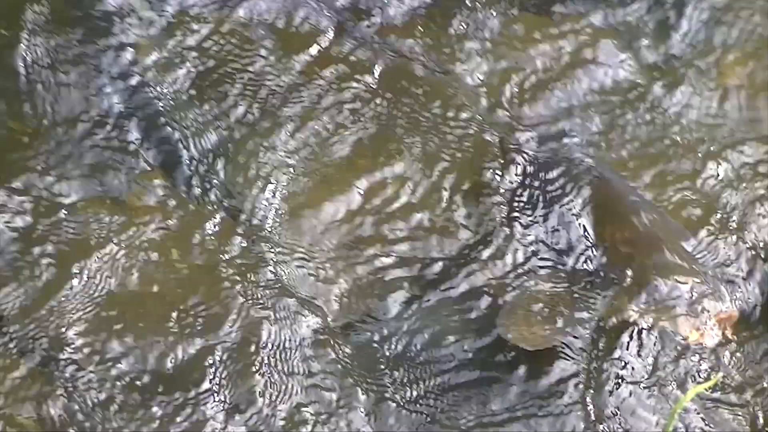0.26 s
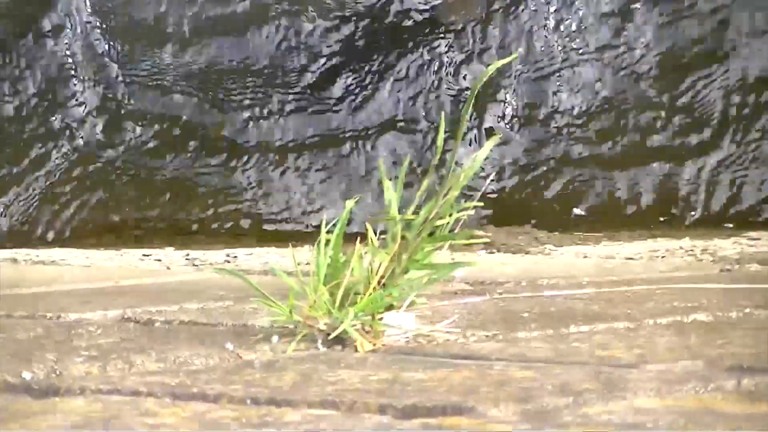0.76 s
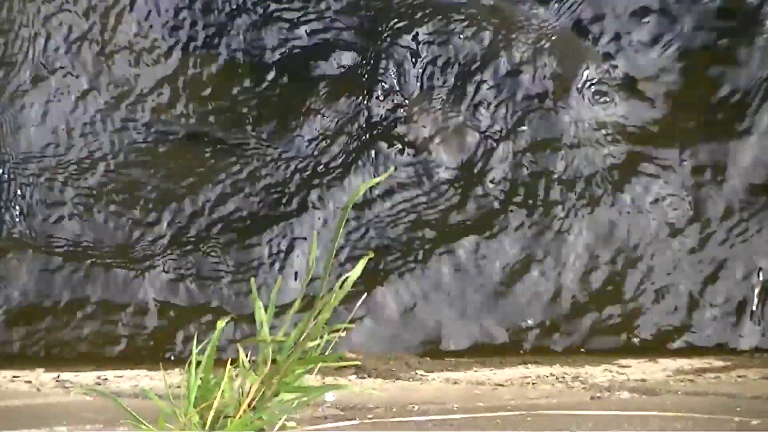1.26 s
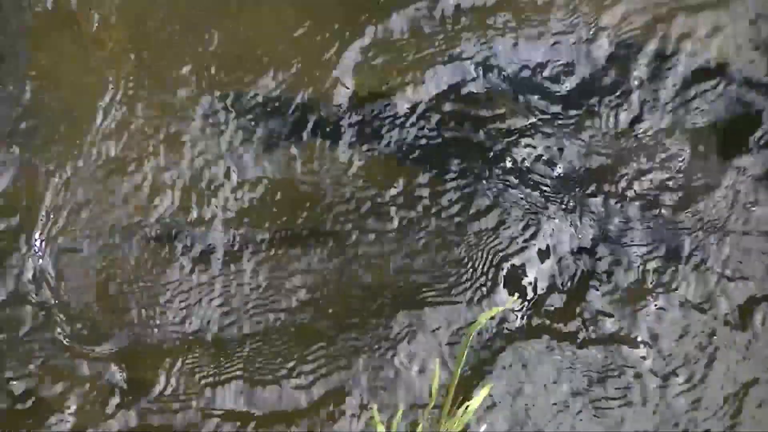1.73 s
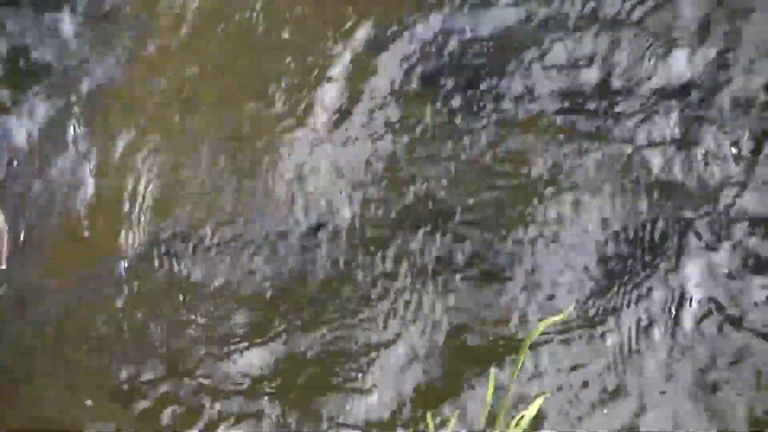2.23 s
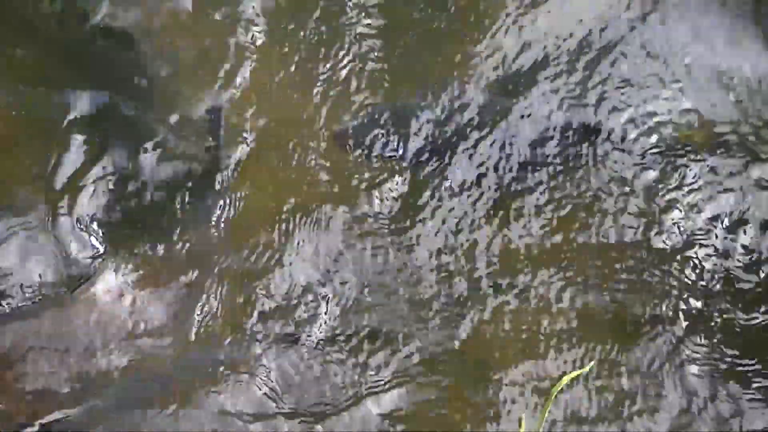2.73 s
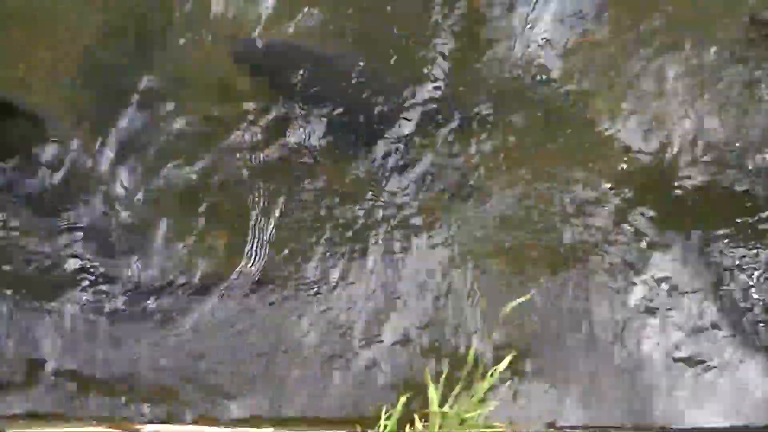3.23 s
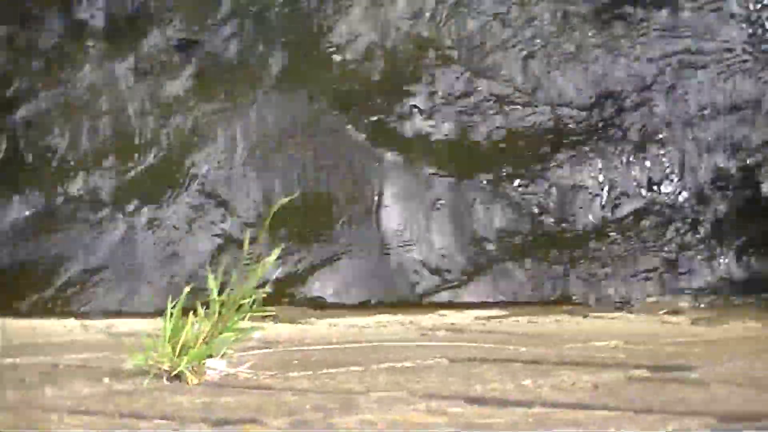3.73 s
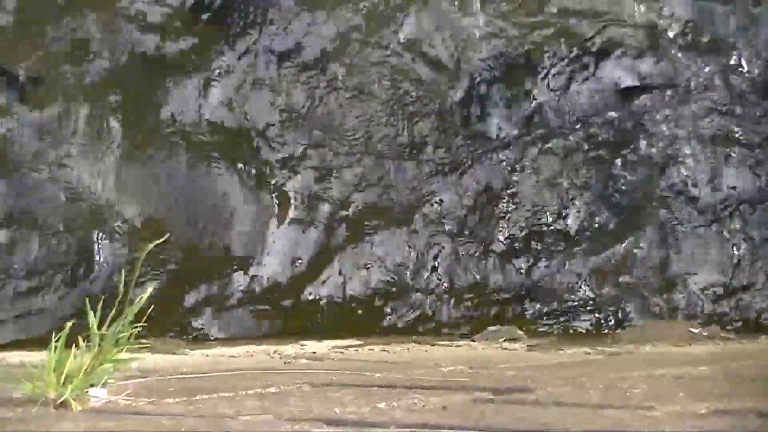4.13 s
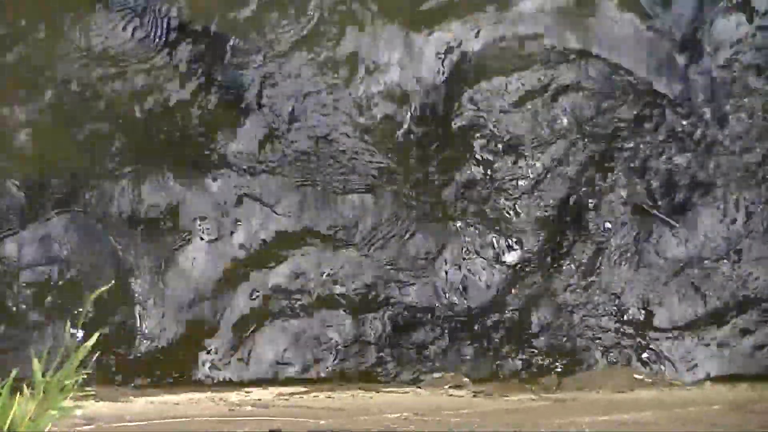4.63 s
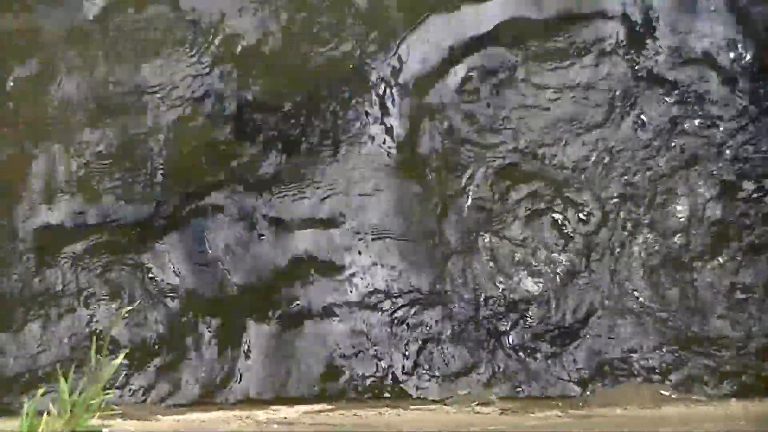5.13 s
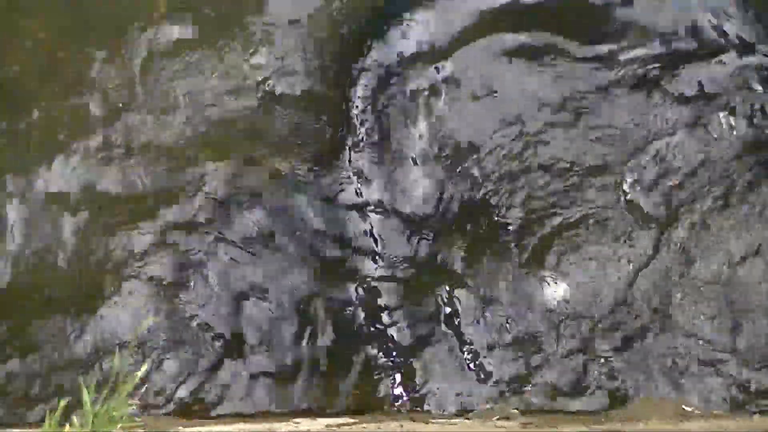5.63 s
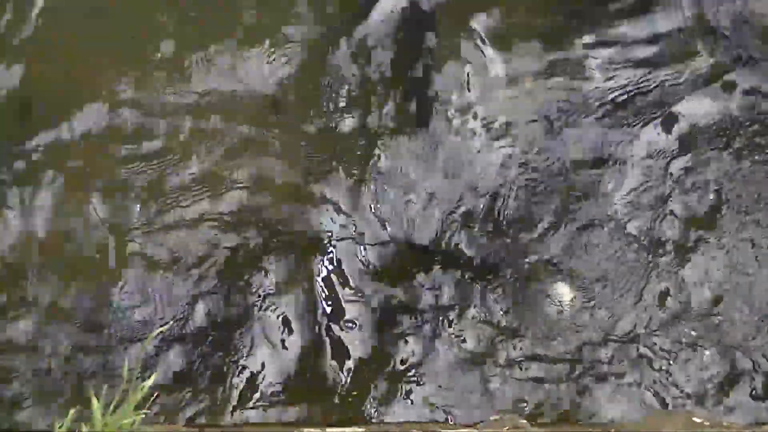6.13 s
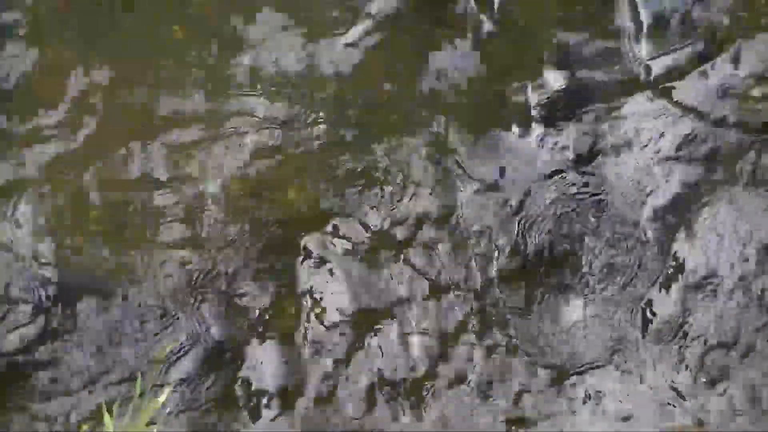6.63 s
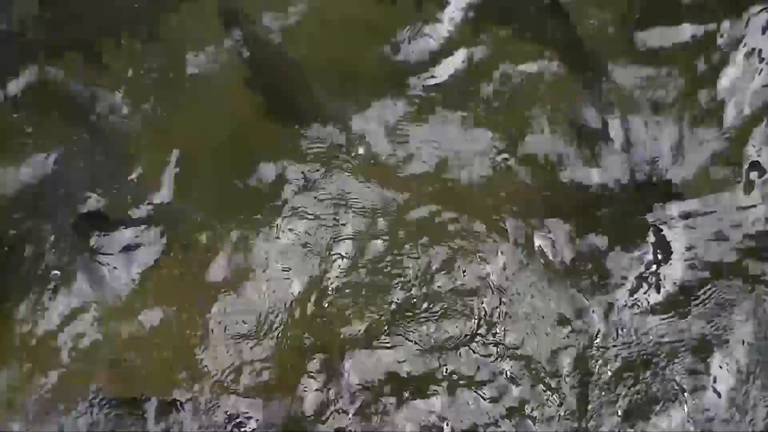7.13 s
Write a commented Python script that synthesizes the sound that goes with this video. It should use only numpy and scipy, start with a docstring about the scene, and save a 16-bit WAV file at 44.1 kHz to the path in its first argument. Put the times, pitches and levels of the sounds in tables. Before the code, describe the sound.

River water rushes softly while fish smack sharply at the surface, then thrash in bubbly splashes with spray, ringing plops and ticking drops.

```python
"""A river runs past a concrete bank, heard from just above the water.
The current rushes throughout (noise in flickering bands plus small bubbles) over a far wavering hum.
At first a few bubbles, gulps and one light stroke sound; then fish smack sharply (short pops and cracks).
Next a fish thrashes: strokes of bubbly noise and spray, with ringing bubbles and drops, and more smacks.
During the last strokes the hum swells; then one thin sinking whistle passes, and the last bubbles ring."""
import sys
import numpy as np
from scipy import signal
from scipy.fft import rfft, irfft
from scipy.io import wavfile

SR = 44100
rng = np.random.default_rng(int(sys.argv[2]) if len(sys.argv) > 2 else 0)


def output_pcm(signal):
    """Save a mono or channel-first signal as 16-bit PCM at the path in sys.argv[1].

    Samples are clipped to [-1, 1] before scaling.
    """
    pcm = np.clip(np.atleast_2d(signal).T, -1, 1) * 32767
    wavfile.write(sys.argv[1], SR, np.round(pcm).astype(np.int16))


N = 325440  # length of the scene in samples


# tone colour of a smack's crack: pitch_hz, level_db (relative)
CRACK_COLOUR = [(30, -61.5), (150, -34), (400, -62), (900, -16.5), (1700, -4), (2700, -5.5), (4000, -3.5),
                (5500, -8), (8000, -16), (12000, -25), (16000, -45)]
# fish smacks: start_s, pop_peak_db, pop_pitch_hz, rise_cycles (to the pop's peak), crack_db (before the tilt),
# crack_tilt_db_per_octave (around 4000 Hz), crack_length_cycles (of the pop)
FISH_SMACKS = [(1.8190, -17, 1550, 2.4, -15, 3.5, 7.2), (1.8201, -16, 3760, 5.1, -29, -1, 13),
               (2.0807, -14, 6170, 0.61, -25.5, 4, 16), (2.1180, -1, 4770, 1.33, -23.5, 9, 18),
               (2.1629, -1, 4650, 1.17, -18.5, 4, 18), (2.252, -19, 4650, 1.3, -37, 6, 4.3),
               (2.2873, -39, 4200, 2.5, -42, -2, 10), (3.1590, -23, 2210, 3.9, -36, -6.5, 7.9),
               (3.2030, -24, 2180, 1.9, -56, -12, 4.6), (3.6338, -21.5, 3400, 1.2, -24, -0.5, 13),
               (4.1596, -30, 4000, 0.43, -34, 5, 9.4), (4.263, -23, 5000, 0.5, -35.5, 3, 12),
               (4.4396, -31, 4440, 2.5, -37, 2, 10)]


def smacks(tail_db=-0.5, tail_s=0.0034, damping=0.67, attack_s=0.0014):
    """Fish mouths break the surface: a pop, a wet crack, and a short scatter off the bank whose treble dies first."""
    out = np.zeros(N)
    t = np.arange(4096) / SR
    for start_s, pop_db, hz, rise_cycles, crack_db, tilt_db, length_cycles in FISH_SMACKS:
        noise = colour(rng.standard_normal(len(t)), CRACK_COLOUR)
        crack = np.zeros(len(t))
        for centre_hz, band in bands(noise, count=10):
            height = centre_hz / 4000
            burst = np.exp(-(t * hz * height ** 0.2 / length_cycles) ** 4)
            tail = undb(tail_db) * np.exp(-t * height ** damping / tail_s)
            crack += band * undb(tilt_db * np.log2(height)) * (burst + tail)
        crack *= 1 - np.exp(-t / attack_s)
        add(out, start_s, undb(pop_db) * pop(t, hz, rise_cycles) + undb(crack_db) * crack)
    # so small a source radiates no bass
    return signal.sosfilt(signal.butter(2, 300, "high", fs=SR, output="sos"), out)


# tone colours of the slosh and of the spray: pitch_hz, level_db (relative)
SLOSH_COLOUR = [(40, -51), (150, -18), (400, -11), (800, 4.5), (1250, 6.5), (2200, 9), (3500, -0.5),
                (6000, -61)]
SPRAY_COLOUR = [(100, -17), (1500, 19), (3100, 6.5), (4100, -1), (5300, 1.5), (7500, 4.5), (9500, -0.5),
                (13000, -2), (16000, -16)]


def churn():
    """A thrashing fish folds air into the water and throws up a fine spray."""
    gurgle = swarm(count=7000, low_hz=215.5, high_hz=3900, cycles=11.6, spread_db=1.9, lift=0.22)
    slosh = colour(gurgle + undb(-9.5) * rng.standard_normal(N), SLOSH_COLOUR)
    droplets = swarm(count=18000, low_hz=2900, high_hz=15400, cycles=9, spread_db=3.8, lift=0.12)
    droplets = scatter(droplets, wet_db=-10, decay_s=0.00049)
    spray = colour(droplets + undb(-13.5) * rng.standard_normal(N), SPRAY_COLOUR)
    surge = walk(60)  # each wavelet lifts slosh and spray together
    patter = walk(380)  # droplets land in tiny volleys
    slosh = slosh * agitation(column=1) * undb(2.0 * surge)
    spray = spray * agitation(column=2) * undb(2.2 * surge + 2.6 * patter)
    return slosh + spray


# strokes of a fish's tail and body: height_s (moment of greatest strength), slosh_db, spray_db,
# length_s (time constant of the collapse)
FISH_STROKES = [(0.717, -65, -53.5, 0.054), (2.833, -42.5, -50, 0.11), (2.914, -41.5, -44.5, 0.065),
                (3.028, -43, -58, 0.013), (3.067, -46, -51.5, 0.034), (3.163, -43, -44, 0.041),
                (3.318, -48, -47, 0.014), (3.476, -46.5, -55, 0.11), (3.637, -45, -56, 0.14),
                (3.752, -48.5, -49, 0.026), (3.943, -45.5, -46.5, 0.034), (4.03, -46, -54, 0.015),
                (4.258, -48, -51.5, 0.041), (4.446, -46.5, -53, 0.03), (4.822, -42, -53, 0.034),
                (4.966, -48, -55, 0.068)]


def agitation(column, settle_db=-6, settle_s=0.28, build=0.87):
    """Strength of slosh (column 1) or spray (column 2): each stroke builds, collapses and leaves water settling."""
    power = np.zeros(N)
    for stroke in FISH_STROKES:
        height_s, length_s = stroke[0], stroke[3]
        age = np.arange(N) / SR - height_s
        before, after = np.minimum(age, 0), np.maximum(age, 0)
        attack = np.exp(-(before / (build * length_s)) ** 2)
        collapse = np.exp(-after / length_s)
        settling = undb(settle_db) * np.exp(-after / settle_s)
        power += (undb(stroke[column]) * attack * np.maximum(collapse, settling)) ** 2
    return np.sqrt(power)


# large bubbles: start_s, level_db (before onset and layer level), pitch_hz, ring_cycles, glide_octaves_per_s
LARGE_BUBBLES = [(.622, -36, 1040, 28, -1), (.634, -37, 1730, 50, 1), (.87, -33, 1290, 51, -11),
                 (1.5455, -32, 3150, 23, 8), (1.567, -31, 1150, 13, -2), (1.647, -31, 1160, 51, 6),
                 (1.819, -34, 442, 20, -5), (1.8205, -25, 980, 14, 0), (1.898, -39, 420, 37, 0.5),
                 (2.042, -35, 960, 22, -8), (2.29, -33.5, 896, 23, 9), (2.715, -30, 1140, 37, 4),
                 (2.725, -29.5, 2050, 32, -25), (2.768, -26, 1126, 33, 16), (2.783, -31, 1014, 27, -3),
                 (2.785, -33, 700, 9, 0), (2.792, -38, 510, 30, 4), (2.8, -28, 3320, 20, 0),
                 (2.872, -33, 820, 7, 0), (2.8775, -30, 3300, 36, -10), (2.91, -25.5, 480, 20, -12),
                 (2.914, -31, 1350, 14, 0), (2.918, -25, 2130, 20, 0), (2.919, -29, 3030, 18, 0),
                 (2.929, -31, 2300, 35, -12), (3.014, -32, 1170, 25, -2), (3.055, -24, 1490, 12, 0),
                 (3.058, -24, 1114, 30, 15), (3.068, -22.5, 1240, 27, 14), (3.074, -35, 300, 9.8, -2),
                 (3.126, -28, 1350, 13, 0), (3.147, -31, 1150, 9, 0), (3.156, -25, 760, 8.6, -2),
                 (3.167, -36, 437, 10, -9), (3.4524, -28, 2560, 23, 0), (3.463, -30, 717, 33, 0.5),
                 (3.468, -30, 1260, 23, -10), (3.569, -11.5, 1260, 17, 20), (3.637, -27, 1780, 22, 0),
                 (3.681, -26.5, 1085, 26, 17), (3.728, -26, 870, 23, 19), (3.76, -26.5, 2630, 11, 0),
                 (3.911, -23.5, 1750, 19, 10), (3.945, -25.5, 1145, 30, 21), (3.973, -33, 410, 16, -2),
                 (4.005, -31, 1390, 41, -16), (4.025, -26, 1130, 11, 0), (4.128, -23, 785, 5.4, 0),
                 (4.234, -30, 1400, 16, 0), (4.81, -26, 900, 4.5, 0), (4.8135, -27, 2180, 18, 0),
                 (4.817, -31, 960, 12, 0), (4.828, -28, 794, 11, -10), (5.289, -29.5, 990, 10, 0),
                 (5.41, -37, 1750, 30, 0), (6.177, -35, 5330, 22, -2), (6.617, -35, 1970, 32, 12),
                 (6.818, -37, 1140, 64, -10.5)]


def plops(level_db=-4.5, shudder_db=1.0, gurgle_s=0.43):
    """Single large bubbles close to the bank ring, many bending in pitch, shaken by the water; long ones swell in."""
    out = np.zeros(N)
    for start_s, db, hz, cycles, glide in LARGE_BUBBLES:
        ring_s = cycles / hz
        onset_cycles = 0.5 + cycles * ring_s / gurgle_s  # the longer the ring, the slower the swell
        add(out, start_s, undb(db) * bubble(hz, cycles, glide, onset_cycles))
    shaken = out * undb(level_db + shudder_db * walk(450))
    return scatter(shaken, wet_db=-14.5, decay_s=0.0051)


# gulps, air pockets squeezed shut: start_s, start_level_db (before onset and layer level), first_pitch_hz,
# last_pitch_hz, length_s, bend (of the pitch rise, 1 = even), fade_db (change over the length, + grows)
AIR_GULPS = [(.668, -44, 1025, 1550, 0.04, 1.15, -1), (.776, -45, 1120, 1540, .03, 1.24, -2),
             (1.698, -46, 560, 890, 0.036, 1.1, -1), (2.648, -41.5, 587, 1260, .052, 0.73, 4.5),
             (2.826, -36.5, 2210, 3170, 0.015, 0.61, -8), (3.207, -46, 500, 880, .021, 1.1, -3),
             (3.221, -31.5, 2170, 2600, 0.0156, 1.4, -8), (3.358, -41, 386, 1360, .048, 1.8, 5),
             (4.8245, -27.5, 1695, 2800, 0.02, 1.9, -17.5), (4.856, -40, 1250, 2100, 0.01, 1.2, -4)]


def gulps(level_db=-2, wobble=0.046):
    """Water closes on a pocket of air: it keeps sounding, unsteadily, while its pitch sweeps up."""
    out = np.zeros(N)
    shudder = undb(3 * walk(300))
    unsteady = 1 + wobble * walk(350)
    for start_s, db, first_hz, last_hz, length_s, bend, fade_db in AIR_GULPS:
        age = np.linspace(0, 1, int(length_s * SR))
        sweep_hz = first_hz * (last_hz / first_hz) ** (age ** bend)
        hz = sweep_hz * unsteady[int(start_s * SR):][:len(age)]
        phase = np.cumsum(hz) / SR
        opening, closing = 1 - np.exp(-2 * phase), 1 - age ** 8
        envelope = opening * closing * undb(db + fade_db * age)
        add(out, start_s, np.sin(2 * np.pi * phase) * envelope)
    return scatter(out * undb(level_db) * shudder, wet_db=-19, decay_s=0.0062)


# the heaviest drops: start_s, tick_peak_db, pitch_hz, splatter_db (relative to the tick's peak)
HEAVY_DROPS = [(0.8395, -44, 12500, -18), (2.79, -42, 11000, -14), (2.814, -35, 7000, -11),
               (2.8485, -39, 8800, -17), (2.8703, -33, 6500, -8), (2.894, -36, 9000, -10),
               (2.9055, -26.5, 7460, -13), (2.9125, -34, 7200, -10), (2.9155, -39, 9500, -8),
               (3.017, -38, 6940, -3), (3.118, -34, 11500, -9), (3.133, -28, 12500, -16),
               (3.160, -30, 9700, -7), (3.1645, -31, 11500, -10), (3.169, -38, 10000, -8),
               (3.1874, -36, 3250, -6), (3.265, -40, 11000, -12), (3.294, -40, 7000, -10),
               (3.312, -38, 4470, 1), (3.597, -35, 5870, -10), (3.6835, -38, 10500, -10),
               (3.7785, -41, 7960, -1), (3.9245, -32, 5600, -8), (4.0245, -38, 7160, -6),
               (4.1695, -40, 12000, -10), (4.467, -47, 11500, -10), (4.484, -43, 12000, -10),
               (4.8065, -41, 7200, -7), (4.8140, -21, 7200, -32), (4.8735, -43, 6700, -10)]


def drops(cycles=3, splat_s=0.0024, low_skirt_db=5, high_skirt_db=12):
    """Thrown drops tick on the water; each splatters around its own pitch, with skirts in dB per octave."""
    out = np.zeros(N)
    t = np.arange(2048) / SR
    for start_s, db, hz, splat_db in HEAVY_DROPS:
        # the skirts reach five octaves to each side
        hump = [(hz / 2 ** 5, -5 * low_skirt_db), (hz, 0), (hz * 2 ** 5, -5 * high_skirt_db)]
        splat = colour(rng.standard_normal(len(t)), hump) * np.exp(-t / splat_s)
        add(out, start_s, undb(db) * (pop(t, hz, cycles) + undb(splat_db) * splat))
    return out


def trickle(level_db=-68):
    """Stray droplets ring briefly here and there along the bank."""
    return undb(level_db) * swarm(count=160, low_hz=2580, high_hz=7400, cycles=14, spread_db=1.8, lift=0.1)


# tone colour of the current: pitch_hz, level_db (relative)
CURRENT_COLOUR = [(18, -78), (30, -54.5), (53, -27), (109, -11.5), (174, -7), (204, -8.5), (239, -3.5),
                  (415, -2.5), (449, -2.5), (1070, 0), (2120, -3.5), (4300, -10.5), (4780, -10.5),
                  (11700, -24), (16000, -29)]


def current(level_db=-46.5, flicker_db=2.5, swell_db=-0.04, babble_db=-9, lap_db=-14, lap_swing_db=2):
    """The far river rushes, flickering by band; small bubbles babble nearer by and wavelets lap at the bank."""
    noise = colour(rng.standard_normal(N), CURRENT_COLOUR)
    rush = np.zeros(N)
    for centre_hz, band in bands(noise, count=18):
        # the treble comes from many more bubbles at once, so it flickers less
        flicker = flicker_db * walk(24) / np.sqrt(1 + centre_hz / 2500)
        rush += band * undb(flicker)
    babble = swarm(count=2200, low_hz=690, high_hz=6980, cycles=17.3, spread_db=3.0, lift=0.3)
    babble = colour(babble, CURRENT_COLOUR)
    # the negative spread makes some laps much fainter than the rest
    laps = swarm(count=500, low_hz=798, high_hz=2476, cycles=36.0, spread_db=-1.5, lift=0.5)
    laps = unit(laps * undb(lap_swing_db * walk(9.8)))
    water = undb(-0.75) * unit(rush) + undb(babble_db) * babble + undb(lap_db) * laps
    return undb(level_db + swell_db * walk(2.2)) * water


# far hum: pitch_hz, waver (share of the pitch), steady_db, swell_db (added in the swell), swell_length_s
FAR_HUM_TONES = [(207.6, 0.0054, -71.5, -64.5, 0.85), (767, 0.0102, -68, -50, 0.13)]


def hum(flutter_db=2.5, swell_middle_s=4.81):
    """Two faint far tones waver in pitch and strength, and swell once."""
    out = np.zeros(N)
    for hz, waver, steady_db, swell_db, length_s in FAR_HUM_TONES:
        level = undb(steady_db) + undb(swell_db) * swell(swell_middle_s, length_s)
        out += wavering(hz, waver, rate=25) * level * undb(flutter_db * walk(21.86))
    return out


def whistle(middle_s=5.06, length_s=0.21, middle_hz=3590, sag_hz_per_s=400, level_db=-58, flutter_db=2.5):
    """A thin far whistle: one tone, blurred by a quick waver, that sinks slowly in pitch."""
    hz = middle_hz - sag_hz_per_s * (np.arange(N) / SR - middle_s)
    tone = wavering(hz, waver=0.022, rate=230) * undb(flutter_db * walk(130))
    return tone * swell(middle_s, length_s) * undb(level_db)


def bubble(hz, cycles, octaves, onset=0.2):
    """A trapped air pocket rings up over onset cycles, glides in octaves per second and is damped ever faster."""
    life_s = max(cycles, 1) / hz
    t = np.arange(int(life_s * SR) + 2) / SR
    phase = np.cumsum(np.minimum(hz * 2 ** (octaves * t), SR / 2)) / SR
    damping = np.exp(-np.log(1000) * (t / life_s) ** 2)  # 60 dB down at the end
    return np.sin(2 * np.pi * phase) * (1 - np.exp(-phase / onset)) * damping


def pop(t, hz, cycles):
    """A tiny cavity snaps open: a few cycles that swell and die."""
    age = t * hz / cycles
    return np.sin(2 * np.pi * hz * t) * (age * np.exp(1 - age)) ** 3


def swarm(count, low_hz, high_hz, cycles, spread_db, lift):
    """Bubbles of random size, time and strength, each rising by up to lift octaves; rms 1."""
    out = np.zeros(N)
    for when, size, strength, life, glide in rng.random((count, 5)):
        hz = low_hz * (high_hz / low_hz) ** size
        ring_cycles = cycles * (0.5 + life)
        db = -spread_db * np.log(strength + 0.007)
        octaves_per_s = lift * glide * hz / ring_cycles
        add(out, when * N / SR, undb(db) * bubble(hz, ring_cycles, octaves_per_s))
    return unit(out)


def scatter(x, wet_db, decay_s):
    """Ripples and the rough bank return a short diffuse copy of each sound."""
    t = np.arange(2048) / SR
    response = rng.standard_normal(len(t)) * t * np.exp(-t / decay_s)
    return x + undb(wet_db) * signal.fftconvolve(x, response / np.linalg.norm(response))[:N]


def wavering(hz, waver, rate):
    """A tone whose pitch wanders by a small share, rate times a second."""
    return np.sin(2 * np.pi * np.cumsum(hz * (1 + waver * walk(rate))) / SR)


def swell(middle_s, length_s):
    """An envelope that rises smoothly, holds and falls away."""
    return np.exp(-(2 * (np.arange(N) / SR - middle_s) / length_s) ** 4)


def walk(rate):
    """Random levels, rate a second, joined by lines; spread near 1."""
    steps = rng.standard_normal(4096)
    return np.interp(np.arange(N) / SR * rate, np.arange(len(steps)), steps)


def colour_db(hz, points):
    """Read a spectrum on a log-frequency axis."""
    f, db = np.transpose(points)
    return np.interp(np.log(hz + 1), np.log(f), db)


def colour(x, points):
    """Filter a sound with a smooth spectrum; rms 1."""
    gain = undb(colour_db(np.fft.rfftfreq(len(x), 1 / SR), points))
    return unit(irfft(rfft(x) * gain, len(x)))


def bands(x, count):
    """Split a sound into overlapping bands that sum to the whole: (centre in Hz, band)."""
    centres = np.geomspace(100, 15000, count)
    hz, spectrum = np.fft.rfftfreq(len(x), 1 / SR), rfft(x)
    parts = []
    for centre_hz, peak in zip(centres, np.eye(count)):
        weight = np.interp(hz, centres, peak)  # a triangle around this centre
        parts.append((centre_hz, irfft(spectrum * weight, len(x))))
    return parts


def add(out, start_s, sound):
    """Mix a sound in at a time."""
    i = int(np.clip(start_s * SR, 0, N - 1))
    out[i:i + len(sound)] += sound[:N - i]


def undb(db):
    """Decibels to gain."""
    return 10 ** (np.asarray(db) / 20)


def unit(x):
    """Scale to rms 1."""
    return x / np.sqrt(np.mean(x ** 2) + 1e-24)


def scene():
    """The fish and the river, in one channel."""
    fish = smacks() + churn()
    water = plops() + gulps() + drops() + trickle() + current()
    far = hum() + whistle()
    return (fish + water + far)[None]


def record(dry, top_hz=15900):
    """A small camera cuts the treble steeply above top_hz."""
    return signal.sosfilt(signal.ellip(10, 0.1, 80, top_hz, fs=SR, output="sos"), dry)


dry = scene()
out = record(dry)
output_pcm(out)
```